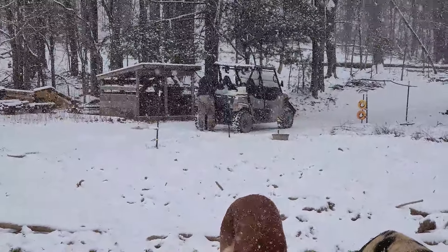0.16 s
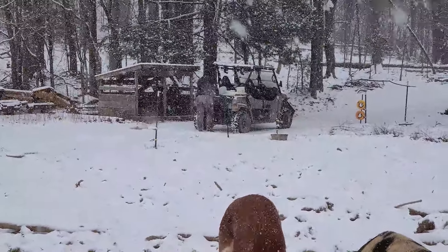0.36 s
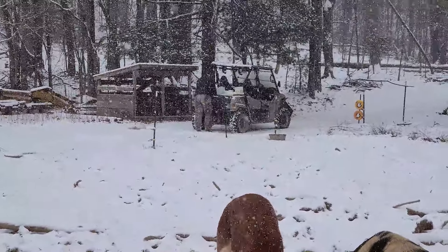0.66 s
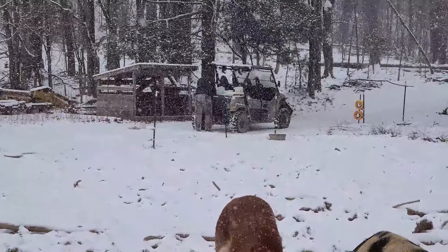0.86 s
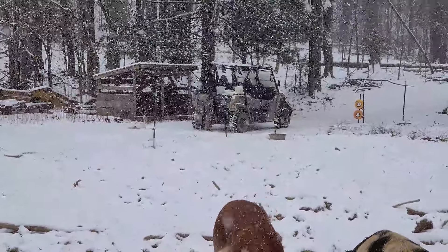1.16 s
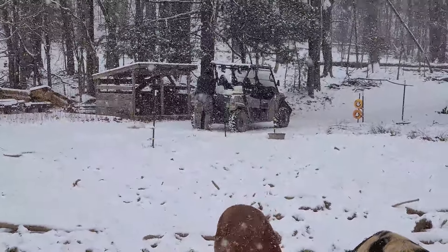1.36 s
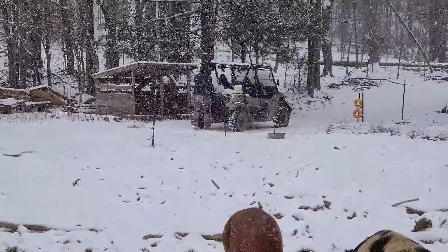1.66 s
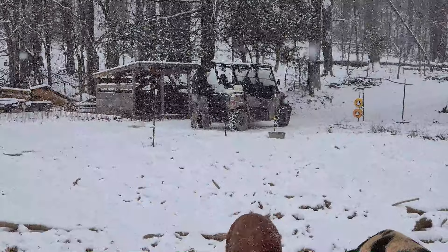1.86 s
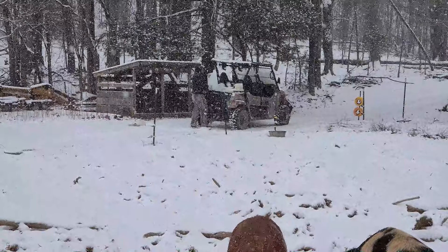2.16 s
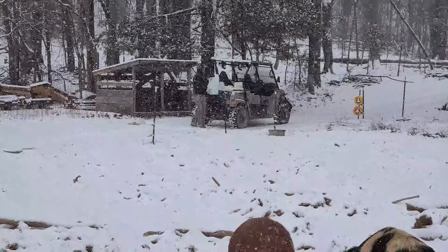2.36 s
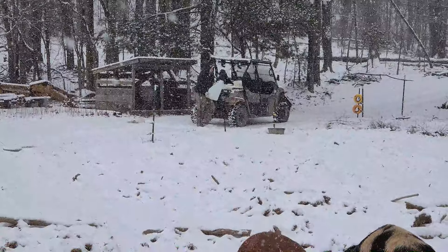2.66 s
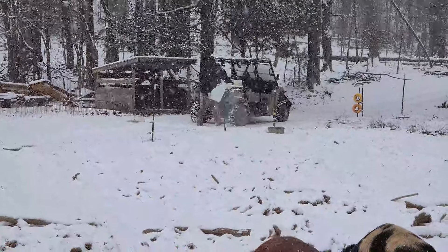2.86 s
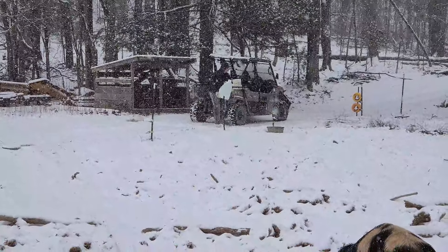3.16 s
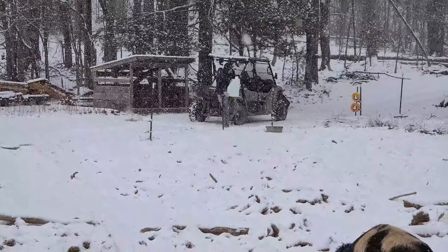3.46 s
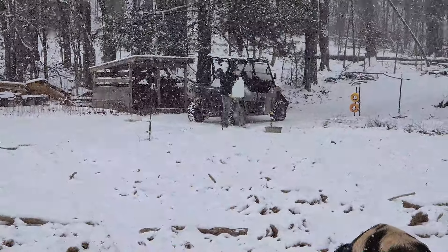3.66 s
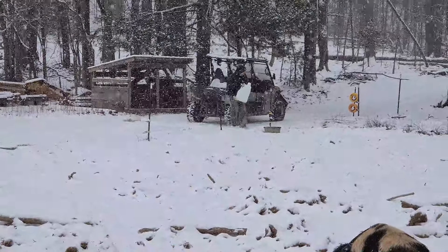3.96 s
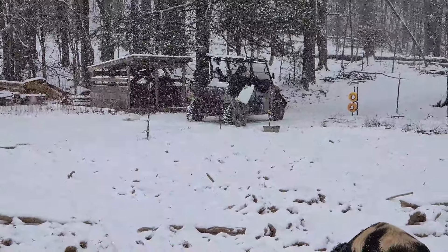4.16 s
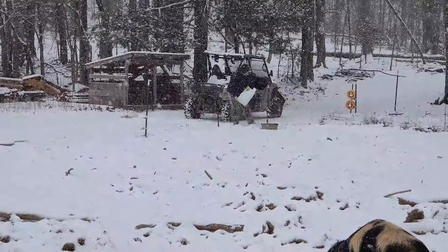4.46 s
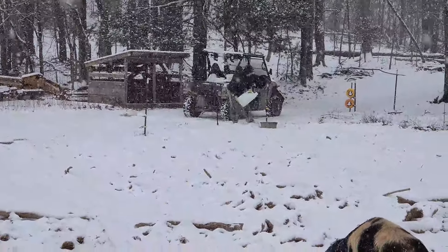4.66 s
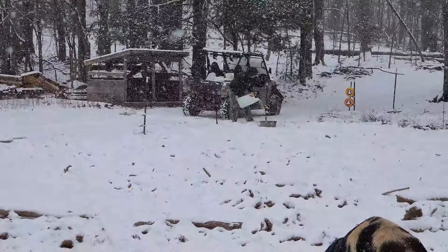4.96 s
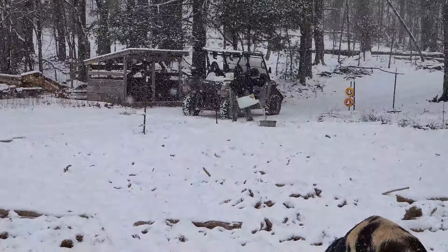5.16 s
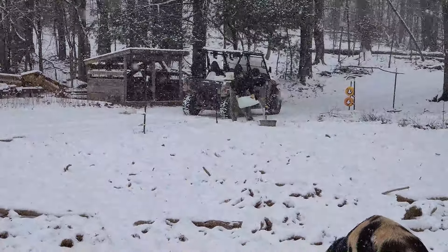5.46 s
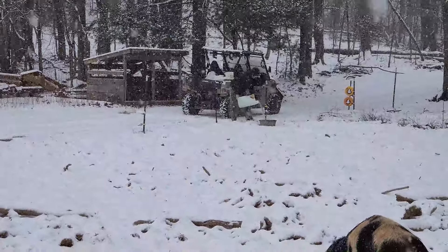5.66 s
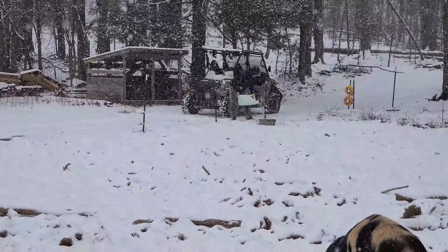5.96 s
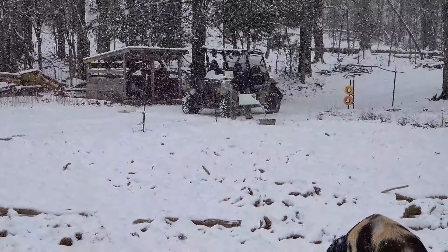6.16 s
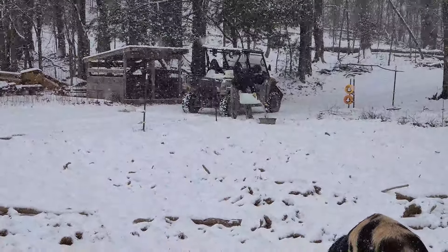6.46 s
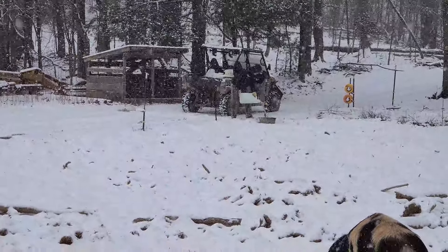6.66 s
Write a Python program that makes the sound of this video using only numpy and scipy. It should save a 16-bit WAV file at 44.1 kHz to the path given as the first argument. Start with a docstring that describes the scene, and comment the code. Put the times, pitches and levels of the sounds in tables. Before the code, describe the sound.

A quiet snowy outdoor pen, close stereo microphones, soft low air noise throughout. From 0 to 3 s the near pig gives weak loose snorts and short hissing snuffles, while a second pig off to the right drones low pulsing grunts, roughly 0.5-1.7, 1.8-2.1 and 2.15-2.9 s, with small creaks near 1.8 and 2.2 s and raspy breaths. Snow crunches sharply at 1.1 s, less at 1.8 s. The near pig's short grunts, a few slow throaty pulses each, come at 3.1, 3.7, 4.05 and 4.65 s among flapping snorts; slow creaks answer at 3.5 s. Around 5.1-5.5 s three grunts cluster with strong wet snuffling, the right pig booming beneath and a crunch at 5.3 s. Loose low snorts follow to 6.1 s. The fullest near grunt lands at 6.4 s, another at 6.55 s, with crunches, creaks and breaths to the end at about 7 s.

```python
"""A snowy pen in winter, two pigs, a pair of microphones. The near pig, right at the microphones, gives short
grunts of a few slow vocal pulses, snorts, loose pulses around its grunts and hissing snuffles; pulses ring its
throat, snout and chest, and shaped noise makes its breath. A second pig, off to the right, drones long low
grunts, creaks and breathes through gliding resonances. Snow crunches in filtered bursts, grunts push air on the
microphones, and the background is quiet coloured noise."""
import sys
import numpy as np
from scipy import signal
from scipy.fft import rfft, irfft, next_fast_len
from scipy.io import wavfile
from scipy.ndimage import uniform_filter1d, map_coordinates

SR = 44100
rng = np.random.default_rng(int(sys.argv[2]) if len(sys.argv) > 2 else 0)


def gain_from_db(level_db):
    """Turn a decibel level (scalar or array-like) into a linear amplitude factor."""
    decades = np.asarray(level_db, float) / 20
    return 10 ** decades


def unload_wav(signal):
    """Save mono or channel-first audio to the path in sys.argv[1] as 16-bit WAV at rate SR, clipped to [-1, 1]."""
    wavfile.write(
        sys.argv[1],
        SR,
        np.round(np.clip(np.atleast_2d(signal).T, -1, 1) * 32767).astype(np.int16),
    )


N = 300762
T = np.arange(N) / SR


def unit(x):
    """Scaled to rms 1."""
    return x / np.sqrt(np.mean(x ** 2) + 1e-20)


def along(points, hz, axis=1):
    """One column of (f/Hz, ..) points, read on a log frequency axis."""
    p = np.array(points, float)
    return np.interp(np.log(hz + 1), np.log(p[:, 0] + 1), p[:, axis])


def curves(spans, quiet):
    """One value per sample for each column; between spans each column takes its quiet value."""
    rows = []
    for span in spans:
        rows += [(span[0][0] - .02, *quiet), *span, (span[-1][0] + .022, *quiet)]
    s, *cols = np.transpose(rows)
    return [np.interp(T, s, c) for c in cols]


def bursts(rows, rise, fall):
    """One gain per sample for each dB column: bursts rise, hold and fall (dB per s) and add in power."""
    s, hold, *cols = np.array(rows, float).T[:, :, None]
    t = T[::32]
    away = rise * np.maximum(s - t, 0) + fall * np.maximum(t - s - hold, 0)
    return [np.interp(T, t, np.sqrt(np.sum(gain_from_db(db - away) ** 2, axis=0))) for db in cols]


def wobble(rate):
    """A smooth random curve, rate knots a second."""
    return map_coordinates(rng.standard_normal(int(N * rate / SR) + 4), [T * rate])


def filtered(x, response):
    """x passed through a complex response of frequency."""
    m = next_fast_len(N + SR // 4)
    return irfft(rfft(x, m) * response(np.fft.rfftfreq(m, 1 / SR)), m)[..., :N]


def noise(spectrum):
    """Coloured noise of rms 1."""
    return unit(filtered(rng.standard_normal(N), lambda hz: gain_from_db(along(spectrum, hz))))


def tract(modes):
    """Causal response of (f/Hz, width/Hz, level/dB) resonances, of alternating sign."""
    def response(f):
        total = 0
        for k, (centre, width, db) in enumerate(modes):
            damping = 1j * f * width
            total = total + (-1) ** k * gain_from_db(db) * damping / (centre * centre - f * f + damping)
        return total
    return response


def moving(x, hz, width_hz):
    """A resonance whose centre follows hz: shift down, smooth, shift back."""
    turn = np.exp(2j * np.pi * np.cumsum(hz + 0 * T) / SR)
    keep = np.exp(-np.pi * width_hz / SR)
    return 2 * np.real(turn * signal.lfilter([1 - keep], [1, -keep], x / turn))


def placed(x, lag, alike, other=0):
    """The left port hears the source lag samples late; other is what reaches it by another path."""
    late = x[np.clip(np.arange(N) - np.round(lag).astype(int), 0, N - 1)]
    return np.array([alike * late + np.sqrt(1 - min(alike, 1) ** 2) * other, x])


def add(x, s, sound):
    """Mix a sound in at time s."""
    i = round(s * SR)
    x[i:i + len(sound)] += sound[:len(x) - i]


def pulse(modes, chest_db, chest_hz, chest_t60, draw, torn=.65):
    """One snap of the vocal folds: low modes glide up as they close, turbulence tears the high ones most."""
    t = np.arange(SR // 16) / SR
    glide = .0007 * (1 - np.exp(-t / .006))  # time lost while the folds are still open
    reopen = np.exp(-(t / .017) ** 4)  # the folds part again and damp the ring
    chest = np.sin(2 * np.pi * chest_hz * t - 1.1) * (1 - np.exp(-t / .0038))
    x = gain_from_db(chest_db - 60 * t / chest_t60) * chest
    for (hz, db, t60), z in zip(modes, draw):
        swirl = signal.lfilter([1], [1, -.97], rng.standard_normal(len(t)))
        swirl = unit(uniform_filter1d(swirl, size=24))
        phase = 2 * np.pi * hz * (1 + .045 * z) * (t - glide * (hz < 1250))
        ring = np.sin(phase + torn * swirl * (.16 * hz / 1000 + .2))
        scatter_db = 2.5 if hz > 1250 else .5
        onset = (1 - np.exp(-t * hz / .85)) ** 2
        x -= gain_from_db(db + scatter_db * z - 60 * t / t60) * ring * onset * reopen
    return x


# near pig's grunts, timed at the main pulse: (t/s, pulse rate f/Hz, fade to the next pulse/dB,
# throat level/dB and f/Hz, snout level/dB and f/Hz, rasp level/dB, chest level/dB,
# snout glide per pulse as a fraction of its f); the voice trims these levels
GRUNTS = [(3.125, 42.6, 26, -64, 500, -24.5, 900, -38.5, -12.5, 0.01),
          (3.726, 46.44, -1, -41.5, 426, -19, 864, -30, -9, 0),
          (4.0605, 42.2, 46, -31, 406, -29.5, 820, -21.5, -9, 0),
          (4.656, 39.1, 8, -24, 452, -27, 1050, -30, -14.5, 0.15),
          (5.071, 42.3, -0.5, -23.5, 388, -19, 884.4, -32, -9, 0),
          (5.281, 42.9, 31, -31, 351, -67, 846.6, -29, -13.5, 0),
          (5.458, 44.2, 40, -24.5, 353.6, -31, 1267, -29.5, -22.5, .05),
          (6.435, 45.45, 31, -10, 356, -14.5, 862, -24, -13, 0),
          (6.564, 50.6, 35, -28.5, 290, -27, 810, -21, -31, 0.15)]
# near pig's snorts and loose pulses around its grunts:
# (t/s, snout level/dB, snout f/Hz, chest level/dB re snout, rasp level/dB re snout)
SNORTS = [(0.137, -36, 760, 7, -1), (0.995, -32.5, 860, -4.5, -2.5), (1.116, -38.5, 820, 3, -24),
          (1.893, -34.5, 1100, 0, -11), (2.233, -35, 1080, -31, -1), (2.813, -27, 812, 2, -0.5),
          (3.227, -39.5, 1170, -28, 0), (3.338, -35.5, 826, 3.5, -2.5), (3.66, -32.5, 1210, -19, -1),
          (3.795, -36.5, 990, -1.5, -3), (3.814, -34.5, 1000, -6, -9), (3.895, -28.5, 890, -2.5, -5),
          (3.969, -41.5, 597, 19, -15), (4.108, -31.5, 1130, -13, -12), (4.134, -38.5, 350, 15, -6),
          (4.272, -34.5, 720, 5, -8), (4.298, -25.5, 783, 3, -5), (4.614, -23.5, 448, -7, -14),
          (4.632, -18.5, 520, -3, -30), (4.699, -29.5, 1160, 7.5, 0.5), (4.71, -25, 1210, -5.5, -14),
          (4.721, -29, 714, 1, -7), (5.158, -29, 450, -30, -0.5), (5.506, -31.5, 330, -18, -1),
          (5.627, -28.5, 280, -25, -28), (5.661, -31.5, 320, -20, -19), (5.752, -30, 276, -0.5, 1.5),
          (5.825, -36, 292, 0.5, 3), (5.964, -29.5, 944, -17, 2.5), (6.057, -30, 284, -22, -4),
          (6.096, -22, 281, -1.5, -4), (6.518, -23.5, 564, -17, -6)]
# upper snout modes: (f/Hz, level/dB re rasp, 60 dB decay/s before the folds reopen)
RASP = [(1560, -3, .019), (2100, -9, .012), (3000, -6, .022), (4300, -17, .015)]


def near_voice():
    """Fold pulses swell to each grunt's main pulse and soon stop; a snort or loose pulse has a weaker flap."""
    x = np.zeros(N)
    for s, rate_hz, fade, db, hz, snout_db, snout_hz, rasp_db, chest_db, glide in GRUNTS:
        for k in range(-3, 3):
            # the snout rings 6 dB less for each pulse away from the main one
            modes = [(hz, db + 12, .028), (.487 * hz, db + 8, .035),
                     (snout_hz * (1 + glide * k), snout_db - 6 * abs(k), .09),
                     (1.305 * hz, db + 9, .02), (1.281 * snout_hz, snout_db - 8, .035)]
            modes += [(f, g + rasp_db, t60) for f, g, t60 in RASP]
            # a growing swell before; the second pulse after is 20 dB weaker again
            drop = 3.5 * (-k) ** 1.9 if k < 0 else fade * min(k, 1) + 20 * (k > 1)
            voiced = pulse(modes, chest_db + .12 * drop, 72, .029, rng.standard_normal(9), torn=.9)
            add(x, s + k / rate_hz, gain_from_db(-drop) * voiced)
            # broad crack as the folds meet
            crack = uniform_filter1d(rng.standard_normal(600), size=9)
            add(x, s + k / rate_hz, gain_from_db(rasp_db - 13 - drop - 60 * T[:600] / .004) * crack)
    for s, db, hz, chest, rasp in SNORTS:
        modes = [(hz, 0, 18 / hz), (1000, rasp / 2 - 4, .016)]  # snout and mouth
        modes += [(f, g + rasp - 6 * (f > 2500), t60) for f, g, t60 in RASP]
        for late_s, flap_db in (0, 0), (.009, -3):
            snort = pulse(modes, chest, 160, .048, rng.standard_normal(6), torn=1)
            add(x, s + late_s, gain_from_db(db + flap_db) * snort)
    return x + spray()


def spray():
    """Wet breathy spray through each grunt, around its main pulse: noise in mouth resonances, one wandering."""
    wet, = bursts([(s - 2 / rate_hz, 3 / rate_hz, -50.5) for s, rate_hz, *_ in GRUNTS], 500, 500)
    mouth = tract([(489.8, 323, 7), (1700, 170, 7), (3950, 200, 7)])
    x = filtered(rng.standard_normal(N), lambda f: mouth(f) / (1 + 1j * f / 4000) ** 2)
    # the wet mouth keeps changing shape
    x += gain_from_db(11) * moving(rng.standard_normal(N), 1000 + 130 * wobble(18), 110)
    return wet * gain_from_db(4.5 * wobble(90)) * unit(x)


# near pig's snuffles: (t/s, hold/s, hiss level/dB, top fizz level/dB)
SNUFFLES = [(0, 0.018, -56.5, -93), (.64, 0.035, -62.5, -73), (.97, 0.17, -60, -77),
            (1.46, 0.018, -60, -101), (1.81, 0.18, -68.5, -93), (2.28, 0.41, -56, -68.5),
            (3.22, 0.04, -56, -78), (3.62, 0.01, -63.5, -80), (3.86, 0.099, -48.5, -59.5),
            (4.2, 0.012, -59, -74), (4.68, 0.079, -58, -76), (5.01, 0.053, -56.5, -69),
            (5.18, 0.032, -45, -55.5), (5.31, 0.074, -48.5, -59.5), (5.52, 0.16, -45.5, -52),
            (5.76, 0.0037, -53.5, -58), (5.94, 0.2, -55.5, -80), (6.31, 0.033, -52, -59.5),
            (6.545, 0.061, -50.5, -74)]
# its breathing between snuffles: (t/s, hiss level/dB, top fizz level/dB)
RESTING = [(0, -87, -86), (2.2, -63, -103), (2.8, -64, -95), (3.5, -73.5, -105), (3.8, -62.5, -86),
           (5, -64.5, -77), (5.8, -58, -67.5), (6.82, -56, -83)]
# colour of the hiss: (f/Hz, level/dB per Hz)
HISS = [(200, -1.5), (380, 0), (600, -5.5), (1000, -2.5), (1800, -6), (3250, -6.5), (4000, -13),
        (4950, -9.5), (6500, -12.5), (9500, -20.5), (11000, -31)]
# colour of the finest fizz: (f/Hz, level/dB per Hz)
FIZZ = [(10300, -30), (11500, -3), (15300, 0), (15800, -5)]
# resonances of the wet clicks in the snout: (f/Hz, width f/Hz, level/dB)
SMACK = [(900, 370, 6), (1390, 660, -24), (2270, 180, 7.5)]


def snuffle(lag):
    """Air through the nostrils: fluttering noise with wet clicks; the finest fizz differs port to port."""
    active = bursts(SNUFFLES, 230, 420)
    hiss, top = np.hypot(active, gain_from_db(curves([RESTING], (-90, -95))))
    flutter_db = 2.2 * wobble(30) + 1.5 * wobble(150)
    jet = placed(noise(HISS), lag, .8, noise(HISS))
    smacks_per_s, smack_db = 45, -6  # on average; level re the hiss
    ticks = (rng.random(N) < smacks_per_s / SR) * rng.standard_normal(N)
    clicks = unit(filtered(ticks, lambda f: tract(SMACK)(f) / (1 + 1j * f / 6000)))
    jet = jet + gain_from_db(smack_db) * placed(clicks, lag, .21)
    port_db = np.array([[1.5], [-1.5]])  # left, right
    fizz = gain_from_db(.35 * flutter_db + port_db) * placed(noise(FIZZ), lag, .08, noise(FIZZ))
    return hiss * gain_from_db(flutter_db) * jet + top * fizz


def train(rate, jitter, scatter_db):
    """Pulses where the running count of cycles passes whole numbers; every second one is weaker."""
    cycles = np.cumsum(rate * (1 + jitter * wobble(40))) / SR
    at = np.flatnonzero(np.diff(np.floor(cycles)))
    x = np.zeros(N)
    x[at] = gain_from_db(scatter_db * rng.standard_normal(len(at)) - 1.5 * (np.arange(len(at)) % 2))
    return x


# long grunts of the pig on the right, one list each: (t/s, pulse rate f/Hz, chest level/dB, snout level/dB)
DRONES = [
    [(.504, 46.6, -52, -81), (.629, 47, -59, -79), (.678, 45.3, -44.5, -77), (.918, 44, -41, -57.5),
     (1.167, 48, -48, -54), (1.4, 53.3, -55, -53), (1.5, 50, -55, -90), (1.746, 36, -62, -65)],
    [(1.8, 46.6, -46, -77), (1.88, 51.5, -58.5, -78), (2.03, 49, -52, -56.5), (2.11, 43, -54.5, -65)],
    [(2.15, 50, -54, -81), (2.23, 49.5, -48.5, -52), (2.809, 48.4, -50, -55), (2.948, 43, -58, -70)],
    [(4.754, 38, -39, -58), (4.994, 40.5, -41, -69), (5.088, 40, -28.5, -45), (5.318, 49, -46, -69),
     (5.468, 43.5, -36, -66), (5.617, 60, -52, -68)],
    [(5.882, 58, -74, -89), (5.961, 47, -45.5, -44), (6.221, 47.7, -44, -77), (6.33, 42, -50, -47)],
]
# its creaks with an open snout: (first t/s, gap t/s, pulses, level/dB, lower f/Hz, lower level/dB re upper,
# upper f/Hz, hoarseness as a plain factor)
CREAKS = [(1.782, .0125, 5, -42, 1080, 3, 1600, .8), (1.866, .016, 4, -44, 800, 0, 1150, 1.2),
          (2.22, .011, 4, -42, 1020, 3, 1620, .8), (2.265, .0195, 7, -47, 950, 2, 1500, 1.1),
          (3.498, .0312, 5, -39, 1150, -8, 1800, .65), (6.452, .0187, 5, -29, 1350, 2, 1570, .15),
          (6.578, .0105, 3, -35, 1600, 2, 1780, .3), (6.776, .009, 4, -42, 1700, 2, 1850, .3)]
# its breaths: (t/s, hold/s, snout level/dB, nostril level/dB)
FAR_BREATHS = [(0, 0.1, -56, -69), (.98, 0.018, -58, -55), (1.43, 0.082, -54.5, -60),
               (1.8, 0.083, -59, -66), (2.3, 0.27, -58.5, -55), (2.68, 0.2, -57.5, -78),
               (6.53, 0.17, -49.5, -77), (6.62, 0.2, -50, -65)]
# shape of its snout, about which the resonances waver: (t/s, lower f/Hz, upper f/Hz)
FAR_SHAPE = [(0, 1260, 2020), (.9, 1120, 1880), (1.3, 1199, 1720), (1.42, 1130, 1790), (1.49, 1217, 2010),
             (1.85, 1030, 1540), (2.3, 1060, 1560), (2.5, 1174, 1632), (2.9, 1240, 1940), (4.8, 980, 1250),
             (5.97, 930, 1590), (6.3, 1410, 1620), (6.62, 1290, 1800), (6.69, 1250, 1970),
             (6.74, 1206, 1800), (6.79, 1270, 1860)]
# its snout resonances, lower, upper and two more: (width f/Hz, level/dB)
FAR_SNOUT = [(70, 10), (190, -4), (400, -22), (300, -21)]
# its chest resonances: (f/Hz, width f/Hz, level/dB)
FAR_CHEST = [(52, 29.7, 0.5), (102.3, 18, 5), (330, 40, -23.5)]
# colour of the air in its nostrils: (f/Hz, level/dB per Hz)
NOSTRILS = [(2000, -6), (3000, 20), (3600, 17), (4150, 10), (5500, 20.5), (7300, 1.5), (9500, 8),
            (11000, -40)]


def far_pig():
    """Slow pulses boom in the chest and rattle in the snout; breath sounds the same snout and the nostrils."""
    rate, chest_db, snout_db = curves(DRONES, (47, -80, -90))
    beats = train(rate, jitter=.04, scatter_db=1.6)
    s, *shape_hz = np.transpose(FAR_SHAPE)
    paths = [np.interp(T, s, c) for c in shape_hz] + [2800, 3910]
    centres = [hz * (1 + .02 * wobble(9)) for hz in paths]

    def snout(x):
        """The four wavering resonances, scaled to rms 1."""
        edge = uniform_filter1d(np.diff(x, prepend=0), size=5)
        return unit(sum((-1) ** k * gain_from_db(db) * moving(edge, hz, width)
                        for k, (hz, (width, db)) in enumerate(zip(centres, FAR_SNOUT))))

    puffs = signal.fftconvolve(beats, gain_from_db(-60 * T[:800] / .035))[:N] * rng.standard_normal(N)
    boom = unit(filtered(beats, lambda f: tract(FAR_CHEST)(f) * f / (f + 25)))
    voice = gain_from_db(chest_db + 2.7 * wobble(13)) * boom
    voice += gain_from_db(snout_db + 1.2 * wobble(30)) * snout(beats + .6 * puffs)
    for first, gap, count, db, low_hz, low_db, high_hz, hoarse in CREAKS:
        modes = [(low_hz, low_db, .07 - .03 * hoarse), (high_hz, 0, .048 - .02 * hoarse)]
        for k in range(int(count)):
            creak = pulse(modes, -30, 90, .03, .7 * hoarse * rng.standard_normal(2), torn=hoarse)
            add(voice, first + k * gap, gain_from_db(db) * creak)

    airy, nostrils = bursts(FAR_BREATHS, 183, 79)
    rasp = gain_from_db(2.2 * wobble(40))
    whistle_hz = 4150 + 250 * wobble(6)  # the nostrils narrow and widen

    def breath():
        """One independent draw of the breath."""
        hiss = noise(NOSTRILS)
        whistle = unit(hiss + 5 * moving(hiss, whistle_hz, 260))
        return airy * rasp * snout(rng.standard_normal(N)) + nostrils * rasp * whistle

    lag = 20  # samples the left port lags
    return placed(voice, lag, 1) + placed(breath(), lag, .78, breath())


# snow crunches: (t/s, level/dB, f/Hz)
CRUNCH = [(0.68, -34.5, 6860), (0.816, -32, 2630), (1.1175, -16.5, 2540), (1.808, -22.5, 2630),
          (1.867, -30.5, 2920), (3.619, -23.5, 4850), (4.945, -37.5, 7160), (5.3393, -18, 4300),
          (6.383, -26, 2800), (6.5465, -21, 3100)]


def snow():
    """Short bright crunches: noise bursts rung by a broad resonance for a few cycles each."""
    x, t = np.zeros(N), T[:900]
    for s, db, hz in CRUNCH:
        crack = gain_from_db(-60 * t / .016) * (1 - np.exp(-t / .002)) * rng.standard_normal(len(t))
        add(x, s, gain_from_db(db) * signal.lfilter(*signal.iirpeak(hz, 1.9, SR), crack))
    return x


# colour of the air pushed onto the microphone: (f/Hz, level/dB per Hz)
PUSH = [(12, -64), (28, 6.5), (42, -9), (60, 9), (110, -3.5), (250, -9.5), (500, -89)]


def buffet():
    """Moving air on the microphone: low noise; every grunt pushes it with the strength of its chest."""
    late_s, push_db = .0022, -26  # after the main pulse; re the grunt's chest
    push, = bursts([(row[0] + late_s, 0, row[-2] + push_db) for row in GRUNTS], 118, 110)
    return np.hypot(push, gain_from_db(-52.5 + 3 * wobble(4))) * noise(PUSH)


# colour of the winter air: (f/Hz, level/dB per Hz)
AIR = [(18, -52), (30, 6.5), (197, -1.5), (270, 3), (808, -8.5), (970, -9.5), (1050, -13.5), (2490, -20.5),
       (4420, -26.5), (6890, -35.5), (15500, -120)]
# how alike the air is at the two ports: (f/Hz, left-right likeness 0-1)
AIR_ALIKE = [(100, 1), (500, 0.27), (1500, 0.76), (6000, 0.032)]


def air():
    """Quiet winter air: mid and side noise, mixed so the ports are most alike in the bass."""
    pair = np.array([noise(AIR), noise(AIR)])

    def shares(hz):
        """Mid and side gains that give the wanted likeness."""
        turn = np.arccos(np.clip(along(AIR_ALIKE, hz), 0, 1)) / 2
        return np.array([np.cos(turn), np.sin(turn)])

    mid, side = filtered(pair, shares)
    return gain_from_db(-59.5 + .11 * wobble(5.5)) * np.array([mid + side, mid - side])


# drift of the near pig, in the end further right: (t/s, samples the left port lags)
NEAR_LAG = [(0, 5.67), (3.9, 3.4), (5.05, 7.8), (5.6, 9), (6.5, 10.9)]


def scene():
    """All sources as at the two ports; near sounds also scatter off fence and ground in a decaying tail."""
    lag = np.interp(T, *np.transpose(NEAR_LAG))
    close = near_voice() + snow() + buffet()
    tail = gain_from_db(-60 * T[:3000] / .15) * rng.standard_normal(3000)
    scatter = signal.fftconvolve(close, tail)[:N]
    scatter = gain_from_db(-48) * np.array([scatter, -scatter])
    return placed(close, lag, .92) + scatter + snuffle(lag) + far_pig() + air()


# left microphone against the right: (f/Hz, level/dB, phase/radians)
LEFT_MIC = [(30, -3.5, -.25), (100, -5.5, -.22), (400, -6.3, -.05), (2000, -5.5, 0), (5000, -4, 0),
            (9000, -1, 0), (14000, 0, 0)]


def band_limit(x):
    """A steep low-pass at the top of the band."""
    return signal.sosfilt(signal.butter(12, 16580, fs=SR, output="sos"), x)


def record(dry):
    """The left microphone is weaker and its bass lags; both are raised 6 dB and cut above 15830 Hz."""
    def left_mic(hz):
        """Gain and phase of the left microphone."""
        return gain_from_db(along(LEFT_MIC, hz)) * np.exp(1j * along(LEFT_MIC, hz, axis=2))

    left = filtered(dry[0], left_mic)
    mix = filtered(gain_from_db(6) * np.array([left, dry[1]]), lambda hz: hz < 15830)
    return band_limit(mix)


dry = scene()
out = record(dry)
unload_wav(out)
```